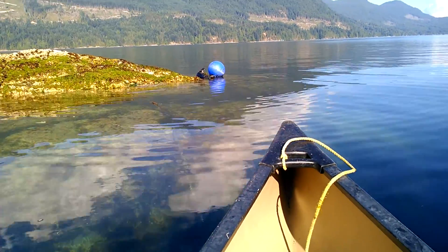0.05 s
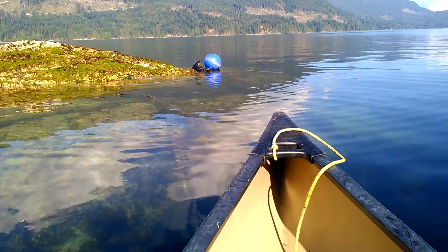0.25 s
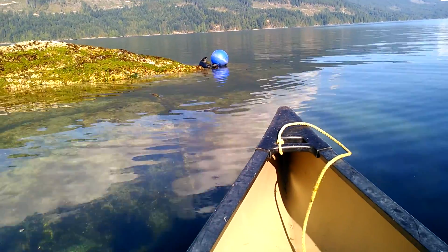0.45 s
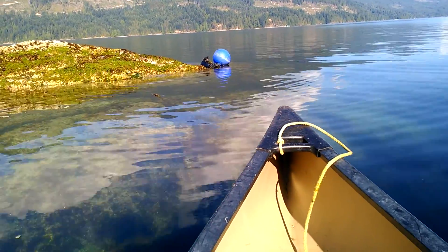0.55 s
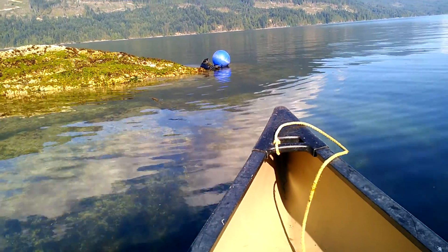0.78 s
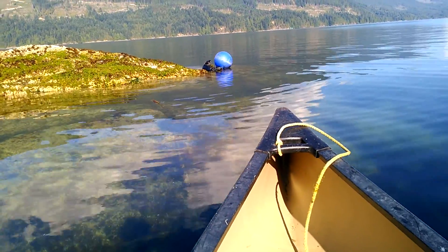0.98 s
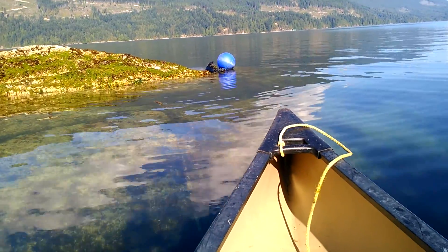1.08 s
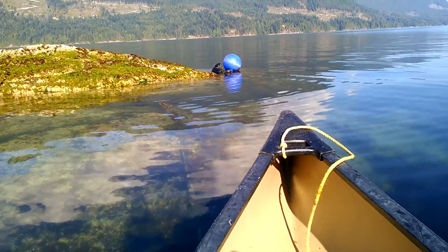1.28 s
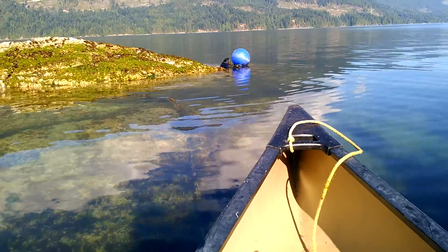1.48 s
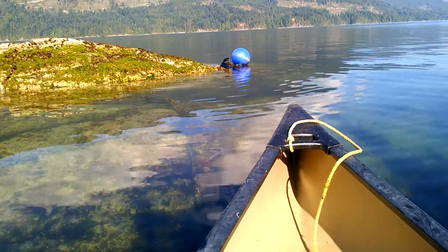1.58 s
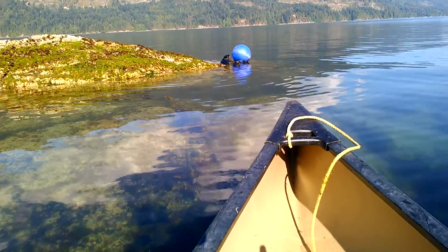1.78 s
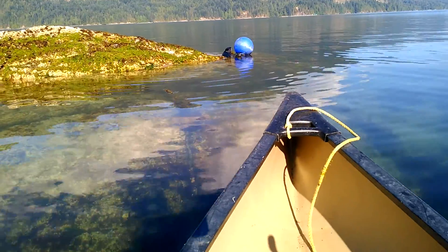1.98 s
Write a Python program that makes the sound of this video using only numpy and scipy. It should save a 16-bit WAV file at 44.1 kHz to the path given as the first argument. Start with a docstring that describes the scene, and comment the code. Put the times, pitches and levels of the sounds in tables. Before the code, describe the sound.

A canoe hull gives one sharp knock, followed by a small dripping splash and a few dull, hollow thumps. Heard close from on board, with faint water wash and hiss on a calm lake.

```python
"""Ripples drum faintly on a drifting canoe, heard from on board, under a rustling hiss and the lake's wash.
One hard knock and several soft bumps excite the hull's normal modes; bending waves are dispersive,
so the low notes arrive last. The rim is lightly scuffed, and air pockets gulp under the hull.
A few drips and a small splash fall alongside, ringing by the resonance of trapped bubbles."""
import sys
import numpy as np
from scipy import signal
from scipy.fft import rfft, irfft
from scipy.io import wavfile
from scipy.ndimage import uniform_filter1d

SR = 44100
rng = np.random.default_rng(int(sys.argv[2]) if len(sys.argv) > 2 else 0)


def store_wav(level_fs):
    """Save 16-bit WAV to argv[1]."""
    pcm = np.round(np.clip(np.atleast_2d(level_fs), -1, 1) * 32767)
    wavfile.write(sys.argv[1], SR, pcm.T.astype(np.int16))


N = 90404
T = np.arange(N) / SR

# ripples drumming on the hull: time_s, level_db
RIPPLE_LEVELS = [(0, -58), (.08, -61.5), (.14, -56.5), (.4, -51.5), (.54, -60), (.6, -67), (.71, -67),
                 (.77, -58.5), (.84, -69), (1.13, -56), (1.28, -63), (1.35, -59), (1.47, -68), (1.6, -59.5),
                 (1.72, -59), (1.93, -53.5), (2.05, -62.5)]
# rustling hiss: time_s, level_db
HISS_LEVELS = [(0, -105), (.035, -75), (.08, -96), (.15, -81), (.19, -73), (.32, -71), (.39, -78),
               (.5, -71.5), (.595, -86), (.635, -63.5), (.72, -71), (.79, -73.5), (.84, -78), (.92, -73.5),
               (1.12, -83), (1.18, -109), (1.21, -76), (1.28, -92), (1.35, -88.5), (1.38, -72),
               (1.512, -72.5), (1.526, -61), (1.62, -65.5), (1.68, -68), (1.74, -76), (1.85, -77.5),
               (1.92, -74), (2.05, -78)]
# blows on the hull: start_s, level_db, brightness_hz, contact_s
BLOWS = [(0.208, -21.5, 4470, 0.00023), (0.416, -52.5, 360, 0.0021), (0.859, -28, 173, .012),
         (0.938, -36.5, 196, 0.0073), (1.019, -51, 163, 0.011), (1.112, -67, 130, 0.0088),
         (1.184, -56, 194, 0.0035), (1.623, -38, 396, 0.015), (1.743, -29, 378, 0.0081),
         (1.869, -49.5, 364, 0.0053), (1.962, -56, 297, 0.0039)]
# normal modes of the hull: pitch_hz, gain_db, t60_s
HULL_MODES = [(52.2, -8.5, 0.2), (77.4, -1, 0.28), (93.4, 6, 0.12), (122.3, -7, 0.18), (144.8, -5, 0.22),
              (162.8, 9.5, 0.097), (208.6, 2, 0.19), (240.2, -7, 0.26), (273.6, -3, .19),
              (323.2, -4.5, 0.16), (372.7, 0.5, 0.069), (421, -17, 0.17), (453, 2.5, 0.069),
              (523.6, -5, 0.091), (552, -6, 0.087), (661, -20, 0.12), (717.5, -24.5, 0.15),
              (802, -11, 0.075), (1007.5, 1.5, 0.032), (1057, -7.5, 0.034), (1337, -26.5, 0.12)]
# crowded upper modes: frequency_hz, density_db, t60_s
UPPER_MODES = [(390, 2, .12), (830, -5, 0.17), (1550, -4.5, 0.055), (2230, -3.5, 0.095), (3240, -18, 0.088),
               (5260, -24.5, 0.15), (7100, -18, 0.091), (14900, -25, .04)]
# friction on the rim: start_s, level_db, rise_s
SCUFFS = [(0.4107, -47.5, 0.0059)]
# air pockets under the hull: start_s, level_db, first_hz, last_hz, rise_s
GULPS = [(0.424, -41.5, 101, 89, 0.0097), (1.188, -39.5, 88, 62.64, 0.014), (1.388, -51, 132, 105.5, 0.02),
         (1.520, -33, 145.8, 48.15, 0.011)]
# bubbles trapped by drops: start_s, level_db, pitch_hz, t60_s, glide_octaves_per_s
DRIPS = [(0.6097, -37.5, 2195, 0.019, 34), (0.613, -43.5, 3260, 0.015, 41), (0.618, -48, 1980, 0.038, 9.5),
         (0.698, -60.5, 1766, 0.059, 15), (0.724, -52.5, 2380, 0.025, 2), (0.7325, -52, 1940, 0.026, 5),
         (0.7751, -49, 2590, 0.0096, -13), (0.776, -60.5, 3520, 0.025, 8), (0.781, -56.5, 1325, 0.075, 31),
         (0.783, -59.5, 870, 0.084, 4.5), (1.379, -54.5, 486, 0.073, -1.5),
         (1.923, -54.5, 2650, 0.017, -19), (1.935, -55.5, 1825, 0.065, 0)]
# splash impacts: start_s, level_db
TICKS = [(0.6119, -29.5), (0.6205, -35), (0.6242, -38), (0.632, -44), (0.6425, -41.5), (0.7116, -50.5),
         (1.374, -47), (1.894, -77)]
# relative noise spectra: frequency_hz, density_db
RIPPLE_SPECTRUM = [(25, 2), (45, -10), (70, 7.5), (95, -1.5), (118, 2.5), (150, -9.5), (200, -18),
                   (300, -23), (600, -40.5)]
HISS_SPECTRUM = [(1000, -40.5), (2500, -20.5), (4500, -1.5), (6000, 1.5), (7300, 7.5), (10000, 6),
                 (15000, 7.5)]
WASH_SPECTRUM = [(150, 0), (300, 3), (480, 1.5), (700, -3), (950, -2), (1300, -10.5), (1900, -9.5),
                 (3000, -14.5), (8000, -47)]
SCUFF_SPECTRUM = [(400, 3), (650, 8), (900, 4), (1600, -15), (2600, -5), (4200, -50), (5700, -2),
                  (7200, -23), (8800, -7), (11000, -24), (15000, -6.5)]
TICK_SPECTRUM = [(1500, -11), (2500, -4), (3800, -1.5), (5200, -15), (6500, 1), (7500, 1), (9000, -10.5),
                 (15000, -6.5)]


def from_db(db):
    """Amplitude grows tenfold every 20 dB."""
    return 10 ** (np.asarray(db) / 20)


def unit_rms(x):
    """Normalisation to unit mean power."""
    return x / np.sqrt(np.mean(x ** 2) + 1e-20)


def at_hz(points, hz, column=1):
    """Interpolation of a table column on a log-frequency axis."""
    table = np.array(points)
    return np.interp(np.log(hz), np.log(table[:, 0]), table[:, column])


def noise(spectrum):
    """Spectral shaping of white noise, at unit rms."""
    hz = np.maximum(np.arange(N // 2 + 1) * SR / N, 1)
    white = rfft(rng.standard_normal(N))
    return unit_rms(irfft(white * from_db(at_hz(spectrum, hz)), N))


def drift(rate_hz):
    """Averaging noise twice leaves a smooth random wander, at unit rms."""
    size = max(int(SR / rate_hz), 1)
    smoothed = uniform_filter1d(rng.standard_normal(N), size, mode="wrap")
    return unit_rms(uniform_filter1d(smoothed, size, mode="wrap"))


def since(start_s):
    """Time elapsed after an onset, zero before it."""
    return np.maximum(T - start_s, 0)


def damped(age, rise_s, t60_s):
    """A rounded onset, then exponential damping of 60 dB in t60_s."""
    return (1 - np.exp(-age / rise_s)) * np.exp(-np.minimum(np.log(1000) * age / t60_s, 40))


def hump(age, rise_s):
    """A smooth pulse that peaks at rise_s."""
    return (age / rise_s * np.exp(1 - age / rise_s)) ** 2


def contact_gain(hz, brightness_hz, slope):
    """A soft contact acts as a low-pass filter on the force of a blow."""
    return 1 / np.sqrt(1 + (hz / brightness_hz) ** (2 * slope))


def ripples(flicker_db=2):
    """The fluctuating pressure of ripples forces a low rumble from the hull."""
    level_db = np.interp(T, *np.transpose(RIPPLE_LEVELS))
    return noise(RIPPLE_SPECTRUM) * from_db(level_db + flicker_db * drift(38))


def hiss_and_wash(hiss_gain_db=3, wash_db=-73, hiss_flicker_db=1.65, wash_flicker_db=2.5):
    """Amplitude-modulated noise: a hiss comes and goes, and the lake's wash partly follows it."""
    level_db = np.interp(T, *np.transpose(HISS_LEVELS))
    swing_db = 0.34 * (level_db - level_db.mean())
    hiss = noise(HISS_SPECTRUM) * from_db(level_db + hiss_gain_db + hiss_flicker_db * drift(100))
    wash = noise(WASH_SPECTRUM) * from_db(wash_db + swing_db + wash_flicker_db * drift(50))
    return hiss + wash


def hull_ring(travel_s=0.00524, swell_s=0.02):
    """Each blow excites the same normal modes; dispersion makes low ones arrive and build later."""
    out = np.zeros(N)
    for start_s, level_db, brightness_hz, contact_s in BLOWS:
        for (hz, gain_db, t60_s), phase in zip(HULL_MODES, rng.random(len(HULL_MODES))):
            slowness = np.sqrt(100 / hz)   # relative to a 100 Hz bending wave
            start = int((start_s + travel_s * slowness) * SR)
            age = T[:min(N - start, int(2 * t60_s * SR))]
            envelope = damped(age, swell_s * slowness, t60_s) * (1 - np.exp(-age / contact_s))
            gain = from_db(level_db + gain_db) * contact_gain(hz, brightness_hz, slope=1.77)
            out[start:start + len(age)] += gain * envelope * np.sin(2 * np.pi * (hz * age + phase))
    return out


def hull_crack(gain_db=-1.5):
    """Modal overlap merges the upper modes into a noise burst, each band with its own decay."""
    out = np.zeros(N)
    edges_hz = np.geomspace(350, 16000, 13)
    for low, high in zip(edges_hz, edges_hz[1:]):
        hz = np.sqrt(low * high)
        bandpass = signal.butter(2, [low, high], "band", fs=SR, output="sos")
        band = from_db(at_hz(UPPER_MODES, hz)) * signal.sosfilt(bandpass, rng.standard_normal(N))
        t60_s = at_hz(UPPER_MODES, hz, column=2)
        for start_s, level_db, brightness_hz, contact_s in BLOWS:
            gain = from_db(level_db + gain_db) * contact_gain(hz, brightness_hz, slope=1.1)
            out += gain * band * damped(since(start_s), contact_s, t60_s)
    return out


def rim_scuff(grain_db=4.0):
    """Sliding friction on the rim radiates a brief, grainy noise."""
    friction = noise(SCUFF_SPECTRUM) * from_db(grain_db * drift(620))
    return friction * sum(from_db(db) * hump(since(start_s), rise_s) for start_s, db, rise_s in SCUFFS)


def gulps(glide_s=0.011):
    """An air pocket under the hull acts as a spring, throbbing for a few cycles as its pitch falls."""
    out = np.zeros(N)
    for start_s, level_db, first_hz, last_hz, rise_s in GULPS:
        age = since(start_s)
        cycles = last_hz * age + (first_hz - last_hz) * glide_s * (1 - np.exp(-age / glide_s))
        out -= from_db(level_db) * hump(age, rise_s) * np.sin(2 * np.pi * cycles)
    return out


def drips(rise_s=0.0012, wobble_share=0.037):
    """Each drop traps a bubble, a damped resonator whose pitch wobbles and glides."""
    out = np.zeros(N)
    wobble = 1 + wobble_share * drift(1000)
    for start_s, level_db, pitch_hz, t60_s, glide in DRIPS:
        age = since(start_s)
        hz = pitch_hz * wobble * 2 ** (glide * np.minimum(age, t60_s))
        cycles = np.cumsum(hz * (age > 0)) / SR
        out += from_db(level_db) * damped(age, rise_s, t60_s) * np.sin(2 * np.pi * cycles)
    return out


def splash(rise_s=0.00054, slap_db=-4, ping_db=-1.5, ping_hz=7550, spread_share=0.058):
    """Each impact gives a broadband slap and the ping of a tiny bubble, whose size sets its pitch."""
    out = np.zeros(N)
    slap_noise = from_db(slap_db) * noise(TICK_SPECTRUM)
    for start_s, level_db in TICKS:
        age = since(start_s)
        hz = ping_hz * (1 + spread_share * rng.uniform(-1.2, 1))
        slap = slap_noise * damped(age, rise_s, t60_s=0.0068)
        ping = from_db(ping_db) * damped(age, rise_s, t60_s=0.0059) * np.sin(2 * np.pi * hz * age)
        out += from_db(level_db) * (slap + ping)
    return out


def scene():
    """The sources add by superposition at one point in the boat."""
    return (ripples() + hiss_and_wash() + hull_ring() + hull_crack()
            + rim_scuff() + gulps() + drips() + splash())[None]


def record(dry, low_cut_hz=30, high_cut_hz=16000):
    """Band limiting rolls off the deepest bass and cuts the top steeply."""
    highpass = signal.butter(2, low_cut_hz, "high", fs=SR, output="sos")
    lowpass = signal.ellip(10, .1, 70, high_cut_hz, fs=SR, output="sos")
    return signal.sosfilt(lowpass, signal.sosfilt(highpass, dry))


dry = scene()
out = record(dry)
store_wav(out)
```